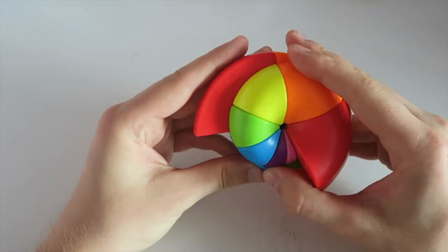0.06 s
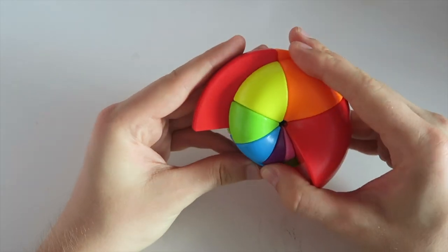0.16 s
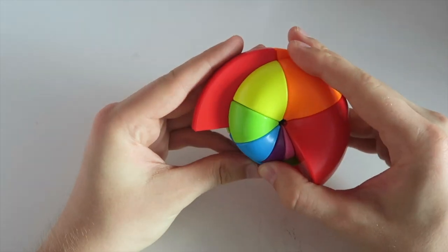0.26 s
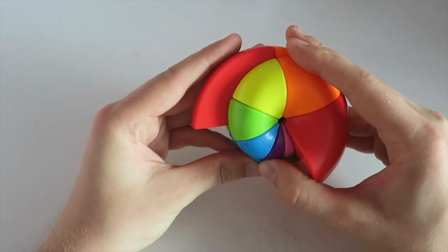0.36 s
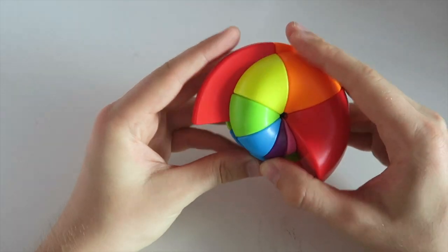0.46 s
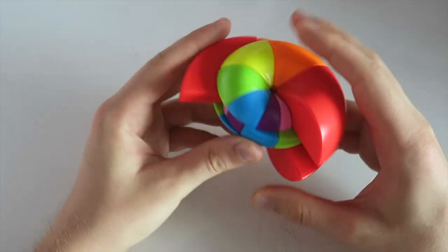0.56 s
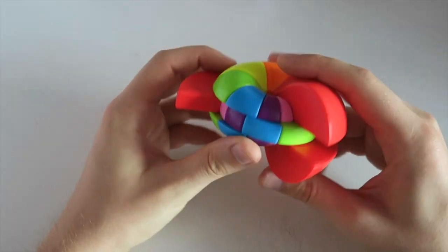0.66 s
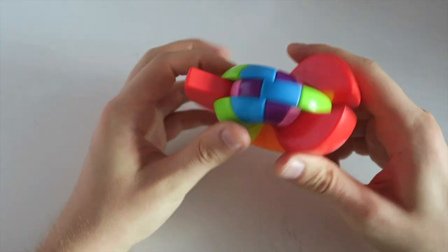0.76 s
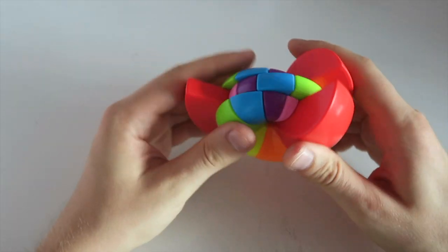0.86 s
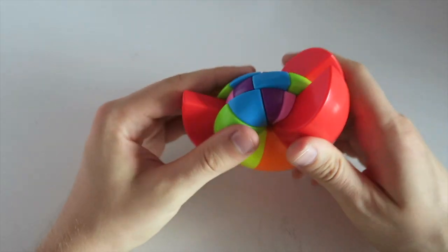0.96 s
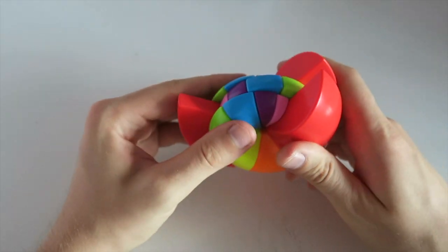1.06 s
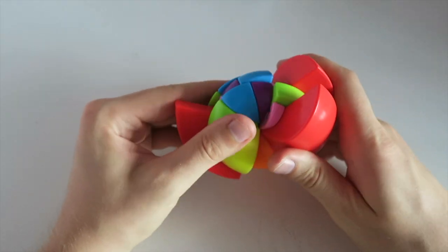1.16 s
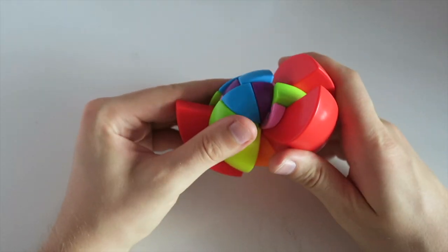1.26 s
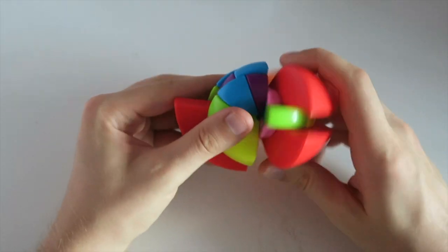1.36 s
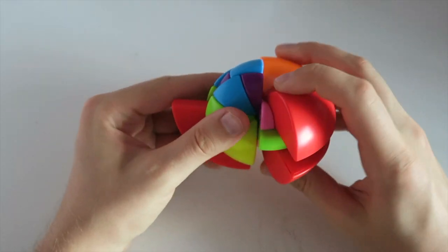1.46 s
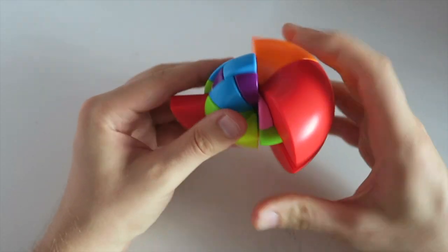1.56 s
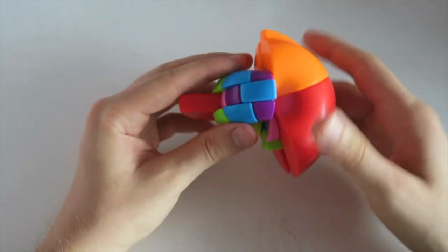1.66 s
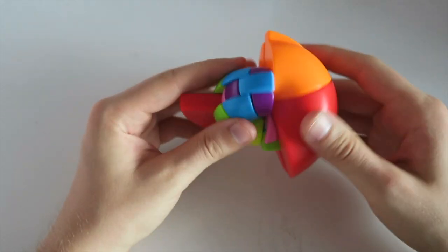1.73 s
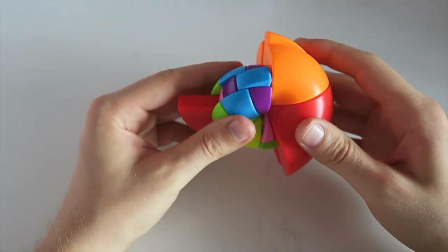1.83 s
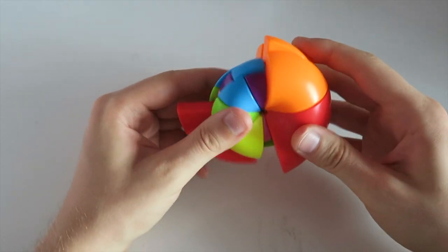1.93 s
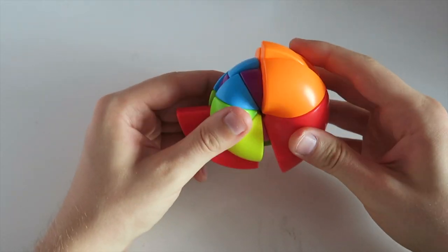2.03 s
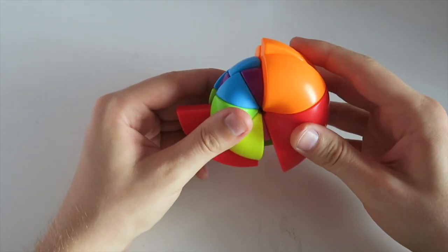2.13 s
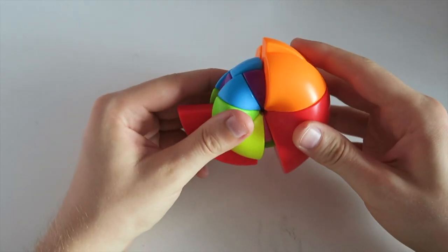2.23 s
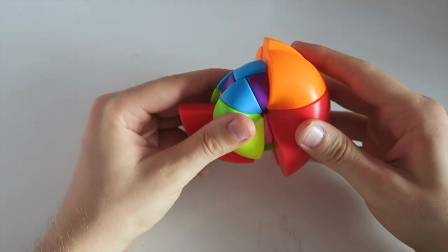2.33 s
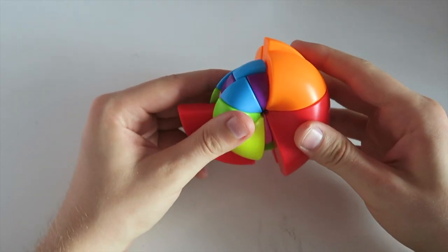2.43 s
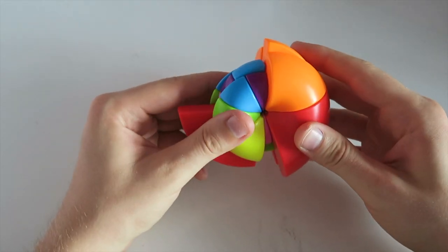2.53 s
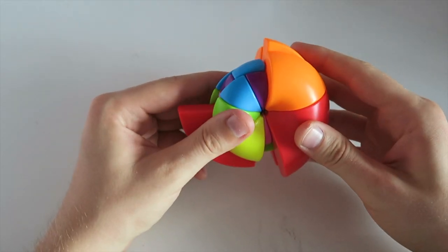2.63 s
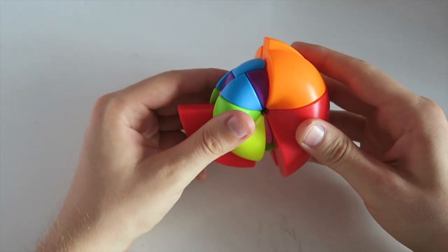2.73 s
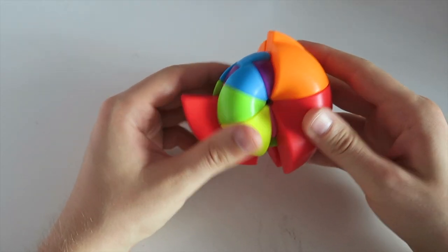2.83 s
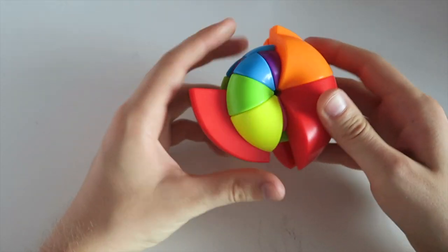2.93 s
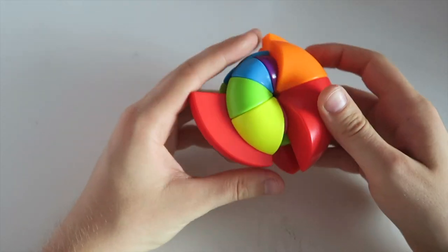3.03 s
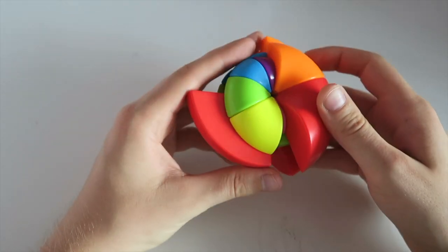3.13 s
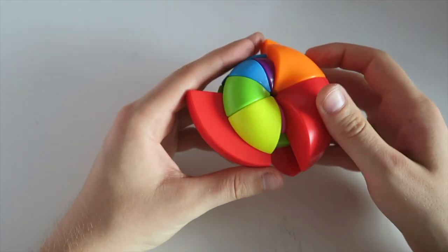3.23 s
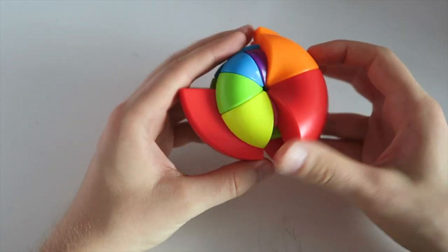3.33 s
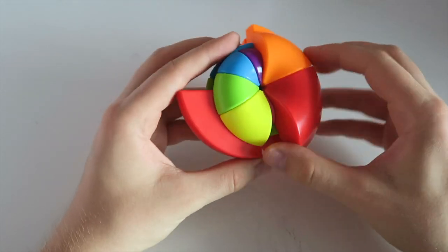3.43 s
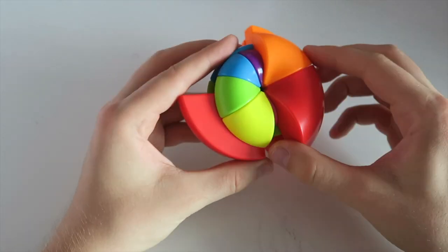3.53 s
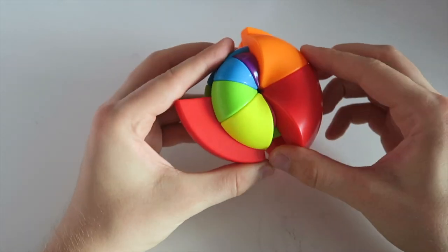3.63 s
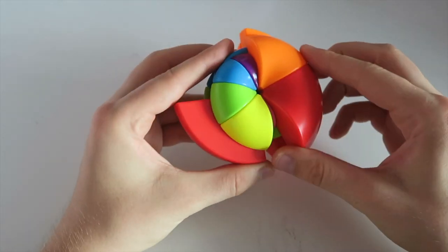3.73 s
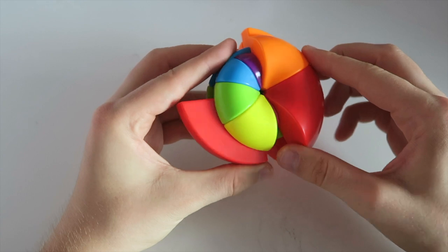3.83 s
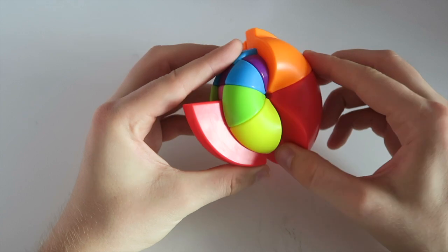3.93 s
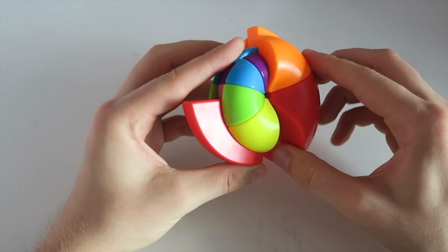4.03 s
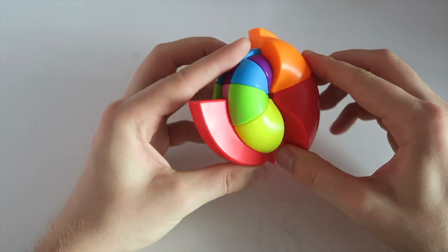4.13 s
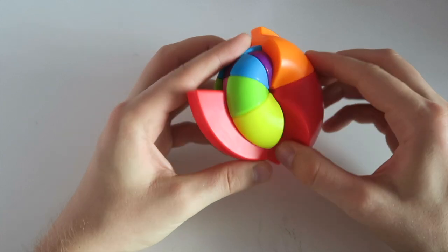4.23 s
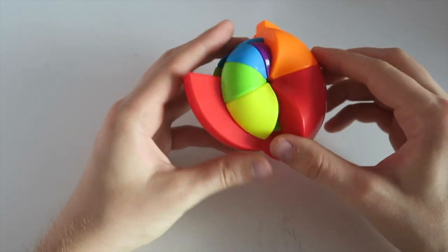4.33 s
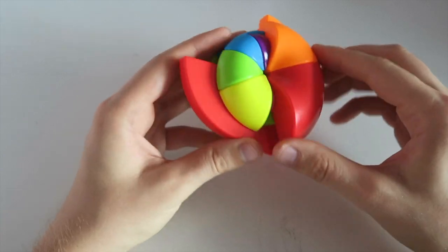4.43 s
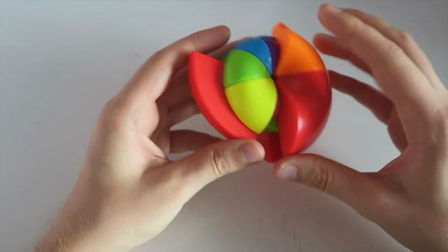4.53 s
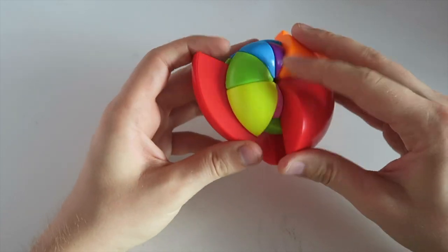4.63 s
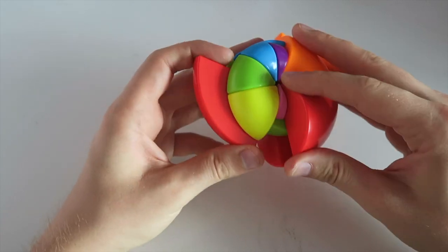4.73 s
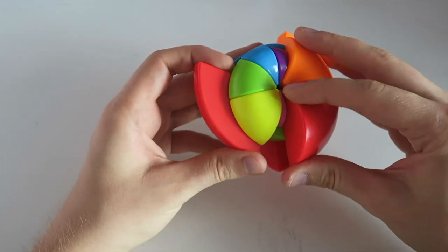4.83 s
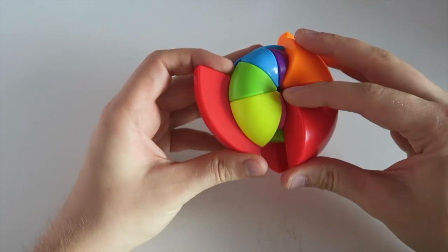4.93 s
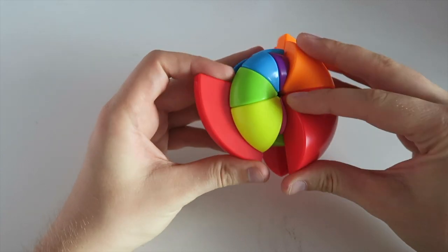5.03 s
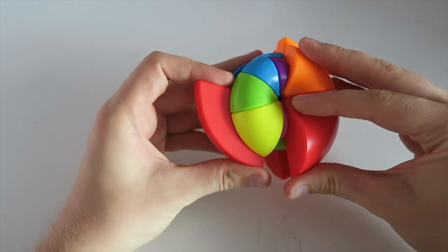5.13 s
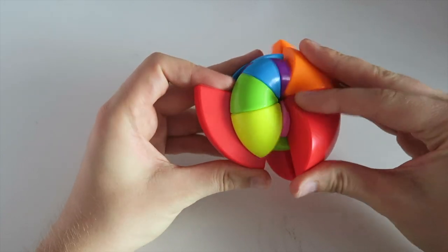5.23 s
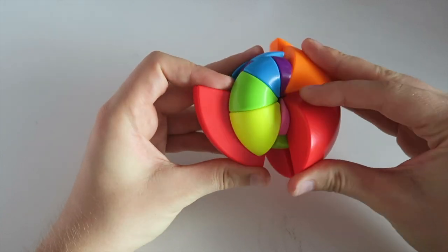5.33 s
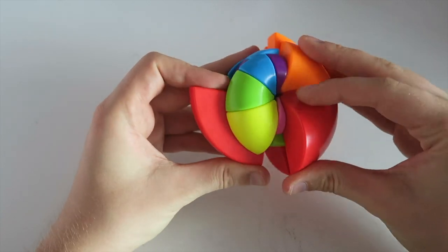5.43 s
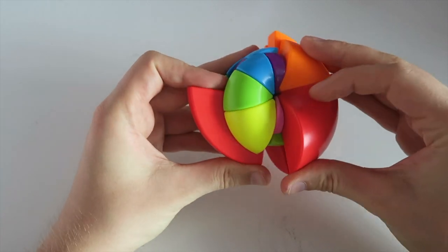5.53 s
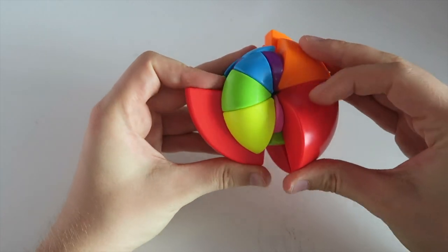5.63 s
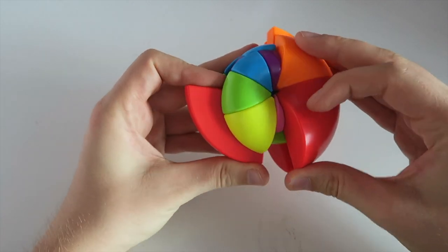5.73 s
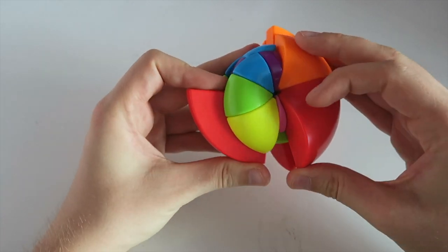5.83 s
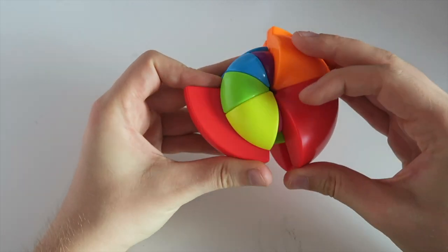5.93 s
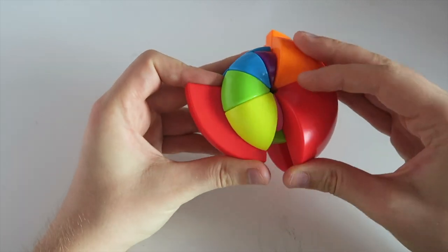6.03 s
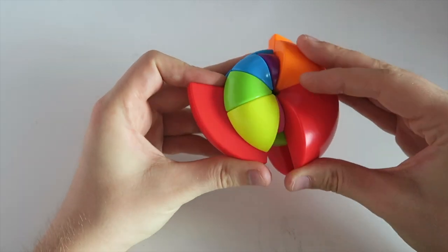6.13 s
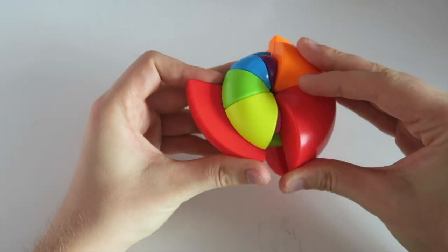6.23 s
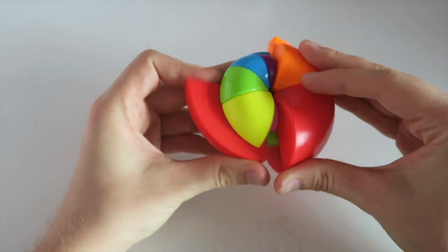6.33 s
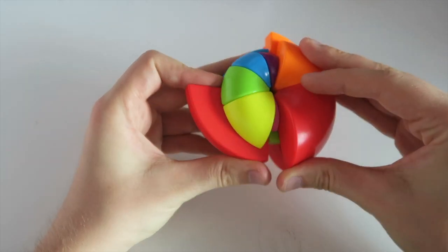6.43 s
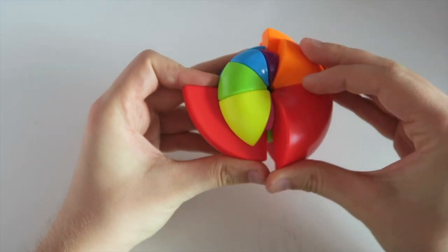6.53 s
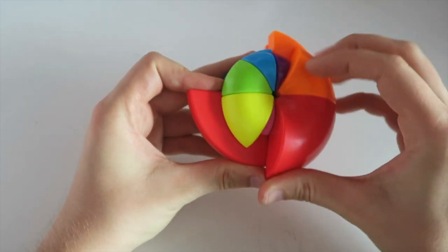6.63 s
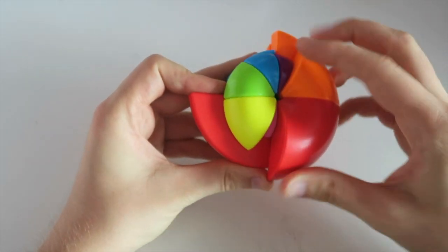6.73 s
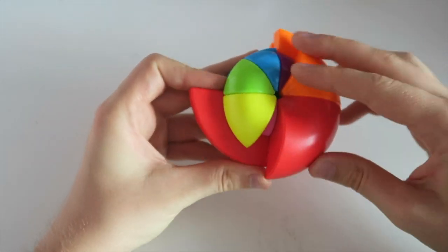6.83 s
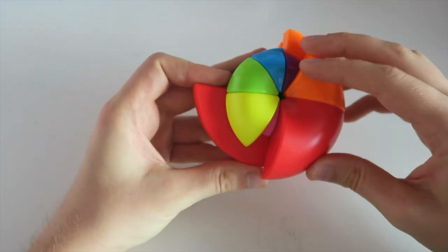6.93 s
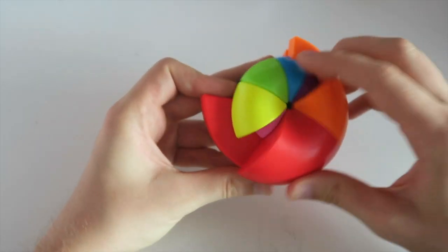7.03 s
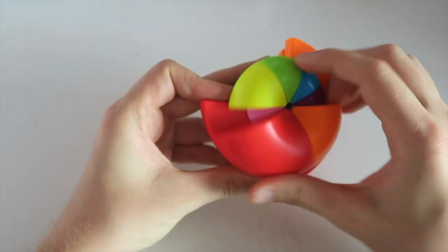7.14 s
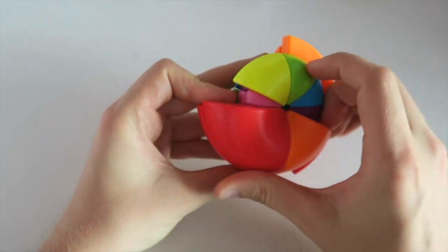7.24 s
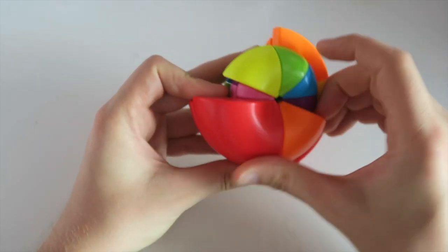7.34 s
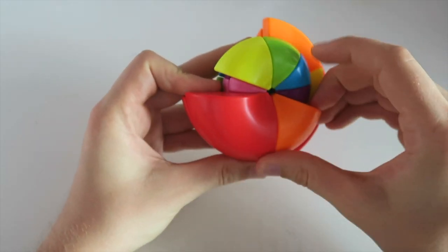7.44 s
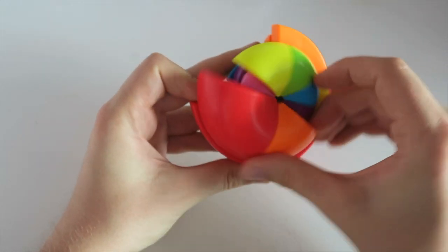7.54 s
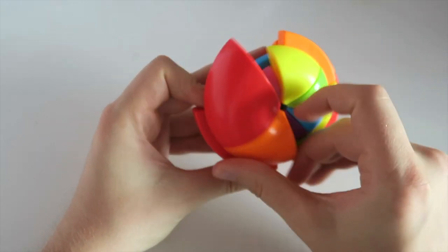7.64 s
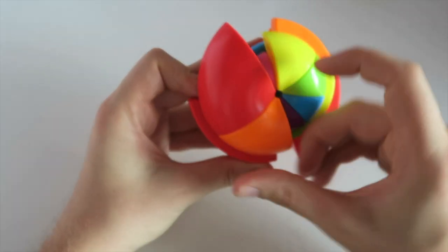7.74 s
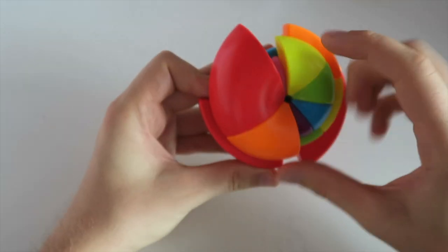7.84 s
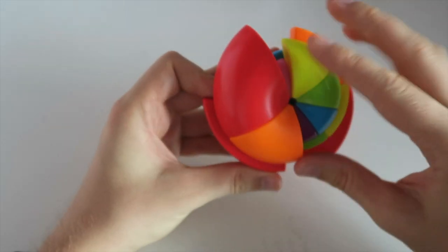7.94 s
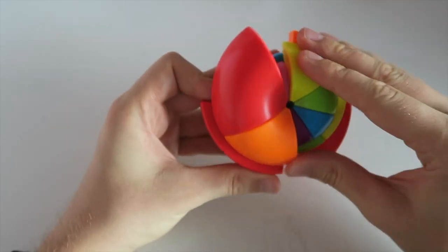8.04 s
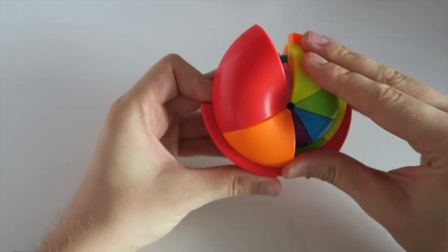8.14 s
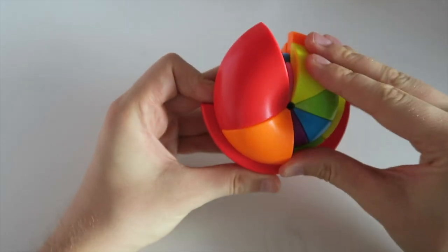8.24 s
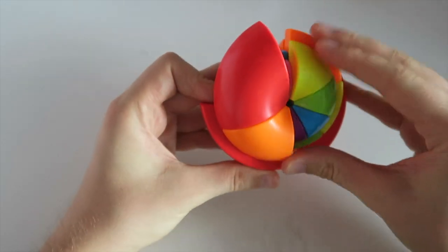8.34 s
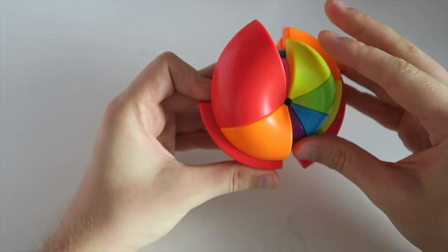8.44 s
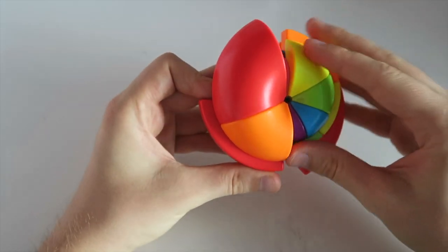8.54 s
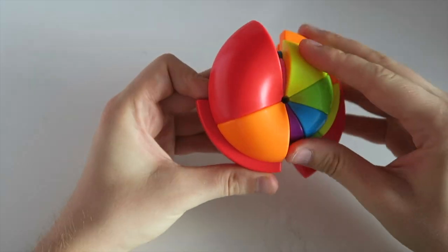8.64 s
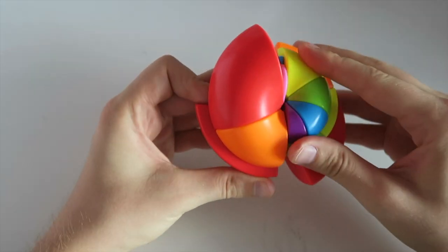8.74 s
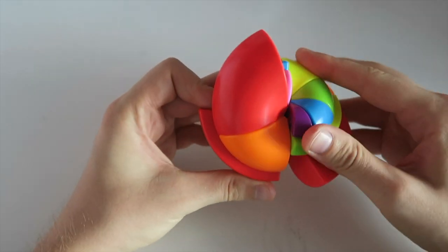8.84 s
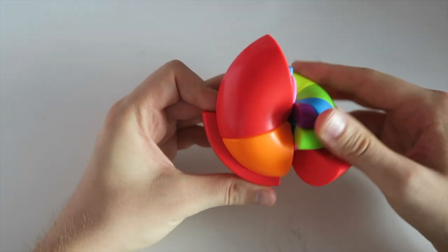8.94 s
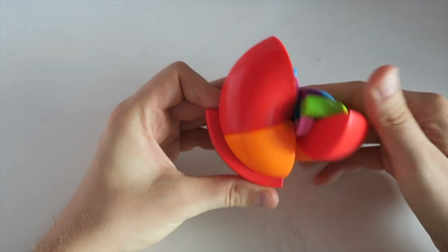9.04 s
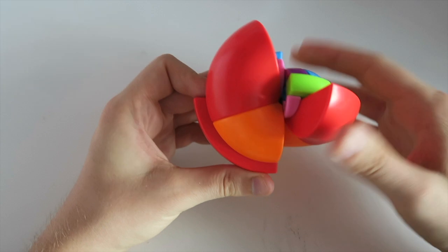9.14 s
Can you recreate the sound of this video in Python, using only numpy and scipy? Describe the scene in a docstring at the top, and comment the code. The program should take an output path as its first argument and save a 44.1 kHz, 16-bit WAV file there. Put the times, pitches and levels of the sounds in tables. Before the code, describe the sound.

Hands twist a hollow plastic puzzle close to a stereo microphone in a quiet room. Pieces click and clack in quick clusters with brief scrapes, then thin out to light, scattered ticks before growing busier again. Near the end, a hand thumps the table and a forearm briefly drags over it, followed by the loudest sharp snap and a few thin clicks. Faint hum and hiss lie underneath.

```python
"""Twisting a hollow plastic puzzle

Two hands work it above a table, close to a stereo microphone in a quiet room. Pieces snap and
chatter into place and ring the shells; turning faces scrape in stick-slip grains. Wrists and
knuckles thump the table and a forearm drags over it. The room answers briefly over hum and hiss."""
import sys
import numpy as np
from scipy import signal
from scipy.fft import rfft, irfft
from scipy.io import wavfile
from scipy.ndimage import uniform_filter1d

SR = 44100
rng = np.random.default_rng(int(sys.argv[2]) if len(sys.argv) > 2 else 0)


def master(y):
    """Save y as 16-bit WAV."""
    cut = np.clip(np.atleast_2d(y).T, -1, 1)
    pcm = np.round(cut * 32767)  # scale
    wavfile.write(sys.argv[1], SR, pcm.astype(np.int16))


N = 404838

# modes of the plastic shells (frequency [Hz], width [Hz], gain [dB])
SHELL_MODES = [(420, 94, 1), (616, 640, -5), (860, 270, -7), (1052, 80, 2.5), (1156, 95, 0.5),
               (1546, 140, -1.5), (2137, 280, 2.5), (2570, 650, 1), (3196, 490, 5), (3620, 98, 3),
               (3863, 87, 2), (4180, 230, 1), (4750, 190, 7), (5490, 630, -1.5), (6860, 190, -21),
               (9000, 230, -31)]


def undb(db):
    return 10 ** (np.asarray(db) / 20)


def at_rms(x, db):
    return x * undb(db) / np.sqrt(np.mean(x ** 2))


def over_hz(table, size):
    """A (frequency [Hz], value) table read at the FFT bins."""
    hz, value = np.transpose(table)
    return np.interp(np.log(np.fft.rfftfreq(size, 1 / SR) + 1), np.log(hz), value)


def tint(x, table):
    """Filter by a (frequency [Hz], gain [dB]) table."""
    return irfft(rfft(x) * undb(over_hz(table, len(x))), len(x))


def walk(rate_hz):
    """Random steps, smoothed twice; spread near 1."""
    hold = int(SR / rate_hz)
    steps = np.repeat(rng.standard_normal(N // hold + 1), hold)
    return 1.3 * uniform_filter1d(uniform_filter1d(steps, hold), hold)[:N]


def add(out, start_s, x):
    i = int(start_s * SR)
    out[i:i + len(x)] += x[:N - i]


def hum():
    """Room rumble and microphone hiss with a faint whine, as unrelated mid and side."""
    # noise spectra (frequency [Hz], relative density [dB])
    mid_spectrum = [(12, -20), (20, -9), (60, 2.5), (116, -1.5), (150, 2.5), (177, -11), (270, -9),
                    (459, -12), (660, -16.5), (1150, -20), (2530, -29.5), (3070, -28.5), (6010, -35),
                    (13900, -47.5), (16000, -92)]
    side_spectrum = [(12, -61), (20, -58), (38, -25), (74, -13.5), (154, 0), (422, 2.5), (485, -2.5),
                     (1090, -10.5), (5080, -25.5), (7950, -33.5), (9140, -29.5), (14700, -49), (16000, -66)]
    mid, side, whine = rng.standard_normal((3, N))
    whine = at_rms(tint(whine, [(6760, -60), (9240, 0), (11720, -60)]), db=-84)
    mid = at_rms(tint(mid, mid_spectrum), db=-52) + whine
    return mid * undb(1.95 * walk(1.804)), at_rms(tint(side, side_spectrum), db=-51.5)


def shell(size, grip_db, crack, damping=1, detune=1):
    """Frequency response of the shells: modes as the grip lets them ring, plus the bare crack."""
    f = np.fft.rfftfreq(size, 1 / SR)
    hz, width, db = np.transpose(SHELL_MODES)[:, :, None]
    hz = hz * np.reshape(detune, (-1, 1))
    width = width * np.reshape(damping, (-1, 1))
    modes = undb(db + grip_db[:, None]) * 1j * f * width / (hz ** 2 - f ** 2 + 1j * f * width)
    return modes.sum(axis=0) + crack


def scrape():
    """Stick-slip grains of restless fingers and sliding faces, coloured by the shells."""
    # sliding faces (start [s], end [s], start level [dB], end level [dB], tilt [dB/octave])
    slides = [(0.517, 0.58, -48, -84, -3), (1.169, 1.24, -41, -37, -1), (1.218, 1.266, -33, -63, -3),
              (1.369, 1.41, -51, -32, -0.5), (1.411, 1.498, -32.5, -57.5, 0.5), (1.77, 1.823, -45, -54, -1),
              (1.811, 1.855, -41, -47.5, -1.5), (1.943, 1.956, -51, -47, -7),
              (1.974, 2.044, -43.5, -35.5, 0.5), (2.04, 2.085, -51, -61, -2),
              (2.19, 2.214, -48.5, -60.5, -3.5), (2.278, 2.364, -60.5, -44, -3), (2.5, 2.532, -54, -51, -5),
              (3.646, 3.698, -74, -59, -3), (4.684, 4.756, -52, -50.5, -4), (4.813, 5.18, -66, -72, -1),
              (5.267, 5.327, -66, -45, 0.5), (5.407, 5.516, -55, -56, -4.5), (5.759, 5.813, -48, -64, -4),
              (5.909, 6.013, -47.5, -58, -2), (6.044, 6.117, -61, -50.5, -2), (6.243, 6.294, -62, -56, -3),
              (7.03, 7.18, -48.5, -61.5, -1.5), (7.141, 7.359, -49, -59.5, -0.3),
              (7.544, 7.683, -71, -43.5, 0), (7.693, 7.807, -43.5, -54, 1), (8.102, 8.113, -45, -72, 3),
              (8.711, 8.792, -49, -49, -2.5), (8.838, 8.89, -54, -43, 0)]
    # friction colour (frequency [Hz], gain [dB])
    friction_tone = [(200, -25), (500, -4), (1200, 2.5), (3500, -4.5), (7000, -9), (12000, -10.5),
                     (16000, -31)]
    grains = rng.standard_normal(N) * undb(1.5 * rng.exponential(size=N) + 3 * walk(150))
    body = shell(N, np.zeros(len(SHELL_MODES)), crack=0.75)
    grit = at_rms(tint(irfft(rfft(grains) * body, N), friction_tone), db=0)
    finger_db = -68 + 4.7 * walk(22) + 2.8 * walk(3.33)
    out = tint(grit, [(1500, -2), (6000, -7)]) * undb(finger_db)  # skin rubs duller than plastic
    for start_s, end_s, start_db, end_db, tilt in slides:
        first = int(start_s * SR)
        last = int(end_s * SR) // 64 * 64 + first % 64
        slide = tint(grit[first:last], [(250, -3 * tilt), (16000, 3 * tilt)])
        fade = signal.windows.tukey(len(slide), .3)
        add(out, start_s, slide * fade * undb(np.linspace(start_db, end_db, len(slide))))
    return out


def ticks(per_s=16, body_db=-3, treble_db_per_oct=-6):
    """Loose pieces tick under the fingers: faint snaps at random times."""
    when, softness, piece = rng.random((int(per_s * N / SR), 3)).T
    crack_db = -63 - 3 * np.log(softness + .04)
    ring_hz = np.array(SHELL_MODES)[(3 + 8 * piece).astype(int), 0]
    return snaps([(time_s, db, body_db, 0, treble_db_per_oct, hz)
                  for time_s, db, hz in zip(when * N / SR, crack_db, ring_hz)])


def table_thumps():
    """Wrists and knuckles ring the table top; a long soft contact wakes only its lowest modes."""
    # blows (time [s], peak [dB], contact [ms])
    blows = [(0.147, -35, 10), (0.619, -32.5, 5.8), (0.707, -43.5, 7.5), (1.787, -32, 5.8),
             (5.33, -40.5, 16), (6.669, -38, 9.9), (7.595, -44.5, 8.7), (7.713, -32, 1.6),
             (7.748, -17, 2.8), (7.775, -24.5, 7), (7.792, -25.5, 3.1), (7.951, -28, 2), (8.25, -40, 9.9),
             (8.848, -38.5, 5.1)]
    # table top modes (frequency [Hz], gain [dB], T60 [s])
    top_modes = [(128, -1.5, 0.085), (145, -4, 0.079), (205, -4, 0.018), (305, -12, 0.041), (336, -5, 0.02),
                 (550, -17.5, 0.11)]
    out, t = np.zeros(N), np.arange(SR // 4) / SR
    top = sum(undb(db) * np.sin(2 * np.pi * hz * t) * 1000. ** (-t / t60) for hz, db, t60 in top_modes)
    for time_s, peak_db, contact_ms in blows:
        force = np.sin(np.pi * np.clip(t[:1024] * 1000 / contact_ms, 0, 1)) ** 2
        acceleration = np.diff(signal.fftconvolve(top, force), 2)  # what the air hears
        add(out, time_s, acceleration * undb(peak_db) / np.abs(acceleration).max())
    return out


def chatter(t, crack_db, loose, chance):
    """A piece lands with one clean blow amid rebounds that build and die; longer when loose."""
    age = t * 1000 / (2.88 + loose)  # decay time in ms
    hits = chance[0] * (np.abs(chance[1]) > 1.2) * np.exp(-age) * (1 - np.exp(-age / 0.71))
    hits[int(.0012 * SR):][:2] += 0.35 + undb(crack_db + 14)  # stands out in loud snaps
    return hits


def struck_shell(size, ring_hz, loose, chance, held_width_hz=300, free_width_hz=55):
    """Shell response to a snap: the struck piece rings most, the others vary in grip and pitch."""
    mode_hz, mode_width_hz = np.transpose(SHELL_MODES)[:2]
    count = len(SHELL_MODES)
    struck = np.exp(-(np.log(mode_hz / ring_hz) / 0.077) ** 2)
    grip_db = (10 + 13 * loose) * struck + 3 * chance[:count] + 6 * loose
    detune = np.exp(0.037 * chance[-count:] * (1 - struck))
    detune *= (ring_hz / mode_hz) ** struck ** 3  # pulls the struck mode to ring_hz
    ring_width_hz = held_width_hz + (free_width_hz - held_width_hz) * loose
    damping = np.minimum(ring_width_hz / mode_width_hz, 1.5) ** struck
    return shell(size, grip_db, crack=0.31, damping=damping, detune=detune)


def snaps(rows, size=2048, lead=128, loose_body_db=-34):
    """Chattering pieces ring the shells in five bands: body, rim, crack and two of treble."""
    # band crossovers, start and end in turn (frequency [Hz])
    edges_hz = [200, 300, 1720, 1980, 2600, 2900, 4200, 4600, 6500, 8000, 11000, 16000]
    # colour of the hollow body (frequency [Hz], gain [dB])
    body_skirt = [(300, -23), (450, -11), (750, -3.5), (980, -4.5), (1250, -0.5), (1600, -2.5)]
    out, t = np.zeros(N), np.arange(size) / SR
    bands = np.array([over_hz(list(zip(edges_hz[k:k + 4], (0, 1, 1, 0))), size)
                      for k in range(0, 10, 2)])
    bands[0] *= undb(over_hz(body_skirt, size))
    body_octaves = over_hz([(275, -2), (2200, 1)], size)  # about 1100 Hz
    treble_octaves = np.array([0.63, 2.58])  # above the crack
    for time_s, crack_db, body_db, body_tilt, treble_tilt, ring_hz in rows:
        # a piece that does not wake the body is free of the palms and pings
        loose = np.clip(body_db / loose_body_db, 0, 1) ** 2
        chance = rng.standard_normal((3, size))
        hits = np.roll(chatter(t, crack_db, loose, chance), lead)
        response = struck_shell(size, ring_hz, loose, chance[2])
        shares = np.vstack([bands[0] * undb(body_tilt * body_octaves), bands[1:]])
        parts = irfft(rfft(hits) * response * shares, size)
        # rim and treble wake more when the struck piece is near their pitch
        rim_db = -8 + 13 * loose ** 2 + 11.5 * np.exp(-(np.log2(ring_hz / 1750) / 0.65) ** 2)
        band_db = np.array([body_db, rim_db, 0, *(treble_tilt * treble_octaves)])
        band_db[3:] += 4.5 * (1 - loose) * bands[3:, int(ring_hz * size / SR)]
        gains = undb(crack_db + band_db) / np.abs(parts).max(axis=1)
        add(out, max(time_s - lead / SR, 0), gains @ parts)
    return out


def forearm_drag():
    """Skin judders over the table and shakes its low modes."""
    # course of the drag (time [s], low band level [dB], upper band re low [dB])
    course = [(7.69, -68, -10), (7.715, -32.5, 4.5), (7.75, -38.5, 4.5), (7.785, -37, 6), (7.83, -31, -8),
              (7.87, -38.5, -21), (7.93, -43.5, -26), (8.05, -52.5, -43)]
    time_s, low_db, upper_db = np.transpose(course)
    t = np.arange(N) / SR
    judder = rng.standard_normal((2, N)) * undb(3 * walk(60))
    low = tint(judder[0], [(25, 3), (60, 3), (100, 10.5), (150, 3.5), (250, -6), (400, -61)])
    upper = tint(judder[1], [(150, -1.5), (300, 9.5), (550, 5.5), (900, -10), (2500, -58)])
    rub = at_rms(low, db=0) + at_rms(upper, np.interp(t, time_s, upper_db))
    touch = uniform_filter1d(1. * (t > time_s[0]) * (t < time_s[-1]), size=600)
    return touch * undb(np.interp(t, time_s, low_db)) * rub


def room(size=24000, onset_s=0.0004):
    """Room impulse response: noise that dies away octave by octave."""
    # reverberation (frequency [Hz], T60 [s])
    decay = [(200, 0.15), (1000, 0.22), (4000, 0.2), (12000, 0.19)]
    decay_hz, decay_s = np.transpose(decay)
    t, out = np.arange(size) / SR, 0
    for hz in 125 * 2. ** np.arange(8):
        t60_s = np.interp(np.log(hz), np.log(decay_hz), decay_s)
        octave = [(hz / 2, -40), (hz * 2 ** -.5, -3), (hz, 0), (hz * 2 ** .5, -3), (hz * 2, -40)]
        out = out + tint(rng.standard_normal(size), octave) * 1000. ** (-t / t60_s)
    out = out * (1 - np.exp(-t / onset_s))
    return out / np.sqrt(np.sum(out ** 2))


def scene():
    """Puzzle, table and room, mixed as mid and side into left and right."""
    # pieces snapping home (time [s], crack peak [dB], body re crack [dB],
    # body tilt [dB/octave], treble tilt [dB/octave], ring [Hz])
    piece_snaps = [(0.1481, -50.5, 5, -5, -2.5, 1050), (0.5313, -42, 11, 3.5, -15, 1540),
                   (0.7577, -50, 7.5, -7, -8, 1050), (1.0965, -43, 0, 0, -4, 2580),
                   (1.0998, -33, 1.5, -2.5, -2, 4670), (1.175, -30.5, -11, -6, -5.5, 2630),
                   (1.209, -20.5, 3, 13, -24, 1640), (1.2145, -16, -3, -2, -4, 2530),
                   (1.2168, -21.5, 11, 6, -27, 1130), (1.2222, -19, -11, 1, -22, 2550),
                   (1.2268, -34.5, 1, 5, -1, 5460), (1.3985, -31, -8, 4, -10, 3600),
                   (1.4014, -22.5, -1.5, -3, -2.5, 2050), (1.4283, -19, -3, -1, -4.5, 2170),
                   (1.548, -44, 7, 8, -34, 1290), (1.7519, -25, -5.5, -7, -0.5, 4700),
                   (1.7823, -40, -2, -2, -16, 2730), (1.8069, -21.5, -12.5, -3, -4, 3830),
                   (1.831, -32.5, -1, -1, -14, 1570), (1.8401, -38.5, 7.5, 4, -14, 1166),
                   (1.942, -42.5, -3, 5, -25, 2080), (1.9528, -54.5, 15, 5, -14, 1070),
                   (1.983, -28.5, 2, -3, -13, 617), (1.9892, -24.5, -2, 0, -4, 2150),
                   (1.9953, -30.5, 8, -1, -16, 1080), (2.0268, -24, 2, -4, -6, 1150),
                   (2.3044, -40.5, -2, 4, -0.5, 1050), (3.264, -60, 14, 2, -8, 1100),
                   (3.301, -61, 9, 0, -3, 1120), (3.6232, -28.5, -3, 3, -6, 3790),
                   (3.626, -41, 8.5, 2, -12, 1130), (3.6678, -42.5, 7.5, -3, -9, 1150),
                   (3.6814, -46.5, 6.5, -4, -5, 1190), (4.5342, -30.5, 2, -1.5, -3.5, 3780),
                   (4.7005, -38.5, 3, -7, -4.5, 1050), (4.7092, -36, -5, -1, -4, 3820),
                   (4.9798, -52.5, 14, 6, -24, 1500), (5.0134, -59.5, 16, -7, -16, 1000),
                   (5.038, -58, 14, -5, -14, 625), (5.0776, -46.5, 4.5, -7, -14, 618),
                   (5.162, -51, -4, -4, -10, 2400), (5.2977, -38, -5, -4, 0.5, 2100),
                   (5.3148, -30.5, 4.5, 0, -5.5, 1160), (5.4186, -40.5, 7.5, -5, -42, 630),
                   (5.465, -34.5, 0.5, 3, -2.5, 660), (5.4804, -43.5, 7, 6, -3, 1190),
                   (5.7387, -46, 4.5, -3, -22, 1020), (5.8, -46, 6, 1, -3, 1200),
                   (5.9197, -33.5, -6, 9, -4.5, 2570), (5.9353, -34, -5, 7, -12, 1070),
                   (5.9842, -40, 4, 1, -4, 1160), (5.994, -34, -2.5, 5, -2.5, 1100),
                   (6.0666, -35, -5, -6, -12, 3760), (6.107, -41.5, 6, -3, -6, 1140),
                   (6.2813, -46, 9, 3, -19, 2100), (6.2915, -44.5, -12, 0, -5, 3550),
                   (6.367, -47, 4.5, 3, -7, 1190), (6.4086, -42.5, -1, 0, -2, 1140),
                   (6.4147, -20.5, -6, -2, -2, 3080), (6.4172, -27, 13, 3, -2.5, 1160),
                   (6.42, -37, 12.5, -3, -8, 1060), (6.4222, -31.5, -25, 4, -9, 4600),
                   (6.431, -42, -26, 0, -13, 3900), (6.555, -43.5, 3.5, -4, -7, 1270),
                   (6.6653, -33, 0, -3, -5.5, 1980), (6.7675, -45, 10, 7, -28, 1190),
                   (6.9069, -48, 3, 12, -20, 1100), (7.0459, -31, 0.5, 0, -6.5, 1130),
                   (7.081, -52.5, 16, 1, -15, 1480), (7.1665, -36.5, 7.5, 4, -10, 1040),
                   (7.209, -49, 12, 5, -11, 1310), (7.2464, -47.5, 10, 3, -2, 970),
                   (7.315, -56, 2, 10, -8, 2020), (7.541, -53.5, -10, 8, -2.5, 5600),
                   (7.5672, -29, -5.5, 16, -1.5, 4130), (7.5934, -34, 11.5, -0.5, -2.5, 1510),
                   (7.6379, -40.5, 5.5, -2, -5, 1380), (7.7082, -40, 9, 4, -13, 1110),
                   (7.7132, -36.5, 11, 10, -0.5, 980), (7.7483, -21, 3, 1, -8.5, 3030),
                   (7.7884, -50, 20.5, 20, 1.5, 1700), (7.95, -38.5, 1.5, 7, -27, 1170),
                   (8.1063, -32, -4.5, 28, -1, 3590), (8.2438, -43.5, 5.5, -3, -4.5, 1550),
                   (8.7267, -30.5, 3, 12, 0, 1450), (8.7364, -28.5, -15, 6, -4, 3640),
                   (8.7998, -40, 2.5, 9, -17, 1540), (8.8468, -29.5, -4, 25, -3.5, 4070),
                   (8.8733, -10, -8.5, -3, -5, 3470), (8.8739, -7, -18, 17, -4.5, 3400),
                   (8.8764, -23, -19, -4, -2.5, 3470), (8.8816, -26, -12, -4, -11, 3580),
                   (8.9605, -30.5, -42, 0, -7, 3800), (8.963, -45, -39, 0, 7, 6700),
                   (8.965, -37.5, -42, 0, -4, 4870), (9.0675, -29.5, -43, 0, -2, 4250),
                   (9.0899, -29, -29, 6, -1.5, 3990), (9.0925, -30, -35, 10, 1, 4800)]
    # side channel filters, overall and for room bass (frequency [Hz], gain [dB])
    side_tone = [(60, -42), (200, -10), (500, -18), (1300, -27), (2400, -31), (4400, -18), (8000, -11),
                 (15000, -6)]
    side_bass = [(40, -30), (110, -9.5), (300, -7), (700, -32)]
    table_echo_s, table_echo_db, room_db = .003, -39, -9.5
    puzzle = snaps(piece_snaps) + ticks() + scrape()
    table_echo = undb(table_echo_db) * np.roll(puzzle, int(table_echo_s * SR))
    near = puzzle + table_echo + table_thumps() + forearm_drag()
    room_mid, room_side = [signal.fftconvolve(near, room())[:N] for _ in range(2)]
    hum_mid, hum_side = hum()
    mid = near + undb(room_db) * room_mid + hum_mid
    # the two microphone ports hear the near sound slightly apart and the room unalike
    side = tint(1.13 * np.roll(near, shift=20) + 0.88 * room_side, side_tone)
    side = side + tint(room_side, side_bass) + hum_side
    return np.array([mid + side, mid - side])


def record(dry):
    """The microphone softens the top treble and rounds peaks; the recorder cuts off the top."""
    # microphone response (frequency [Hz], gain [dB])
    mic_response = [(11000, -0.5), (13500, -2), (16000, -2)]
    ceiling, cutoff_hz = .9, 16300
    heard = np.array([tint(channel, mic_response) for channel in dry])
    heard = ceiling * np.tanh(heard / ceiling)
    return signal.sosfilt(signal.ellip(10, .2, 80, cutoff_hz, fs=SR, output="sos"), heard)


dry = scene()
out = record(dry)
master(out)
```